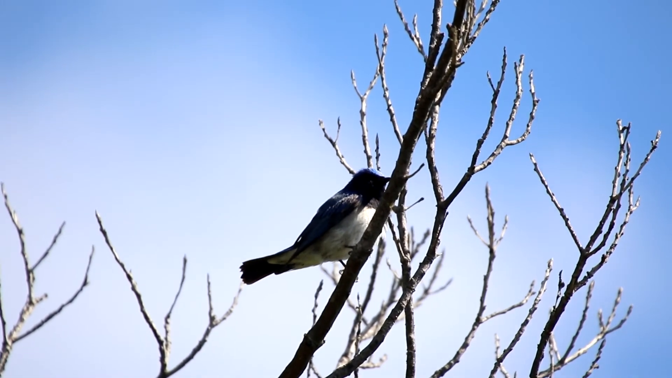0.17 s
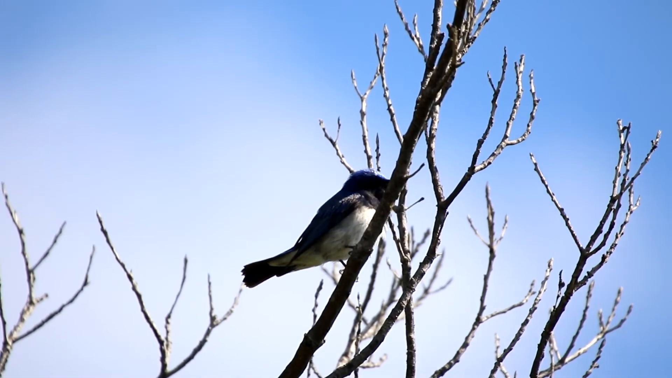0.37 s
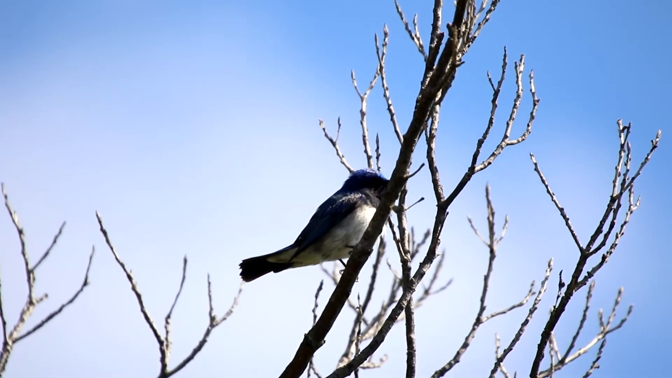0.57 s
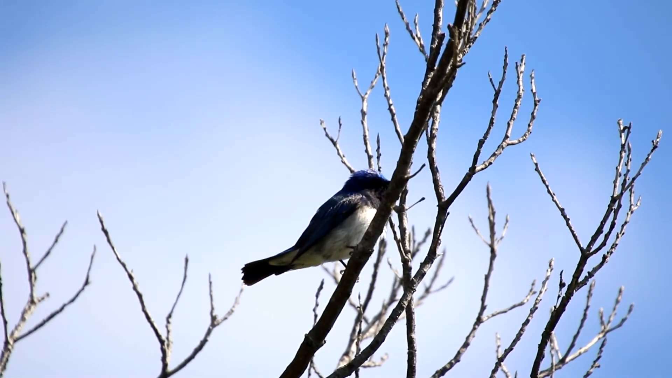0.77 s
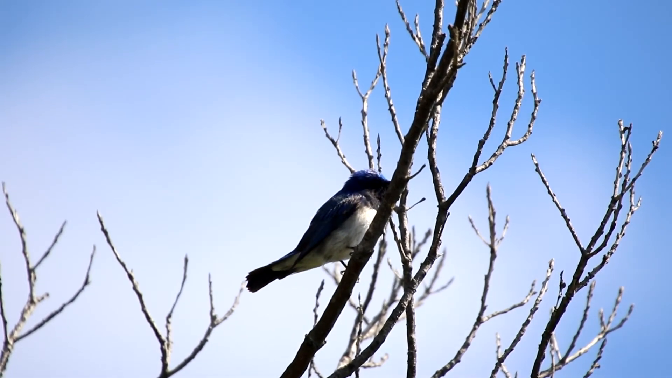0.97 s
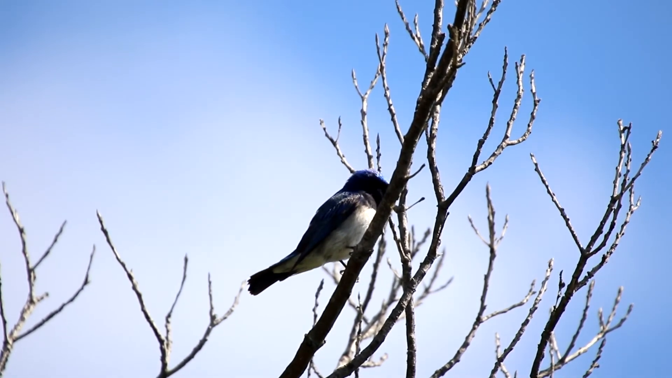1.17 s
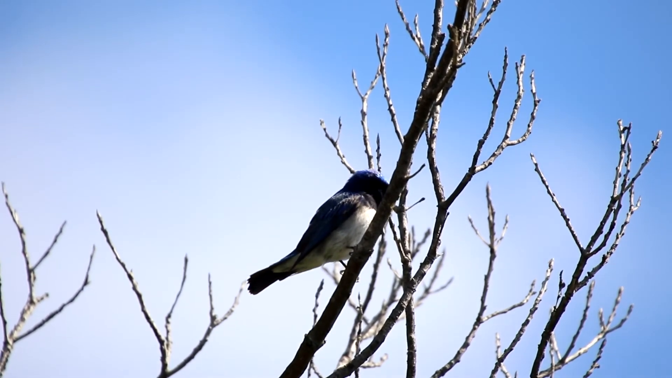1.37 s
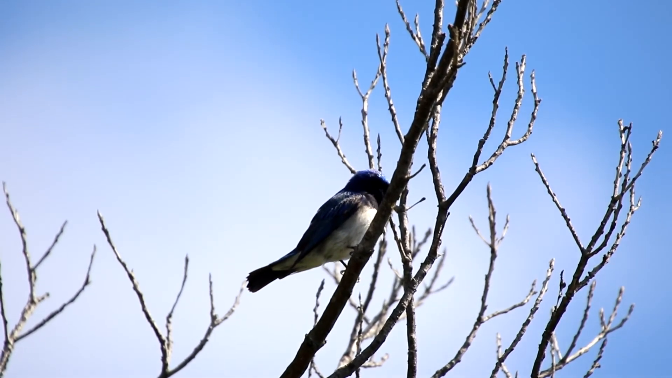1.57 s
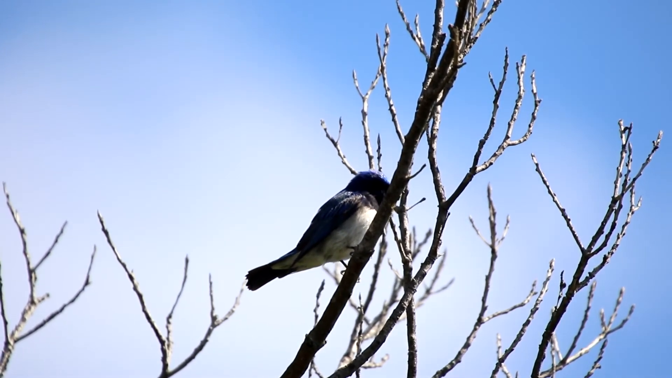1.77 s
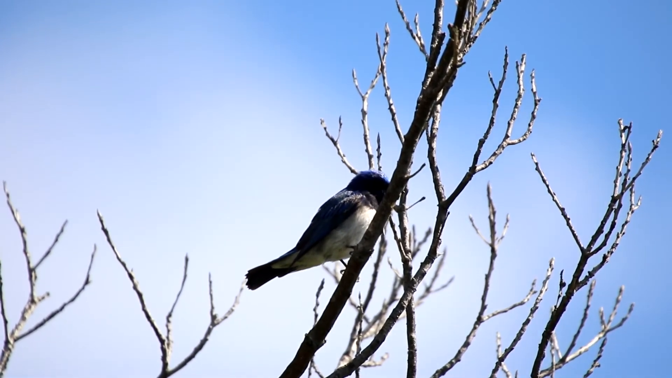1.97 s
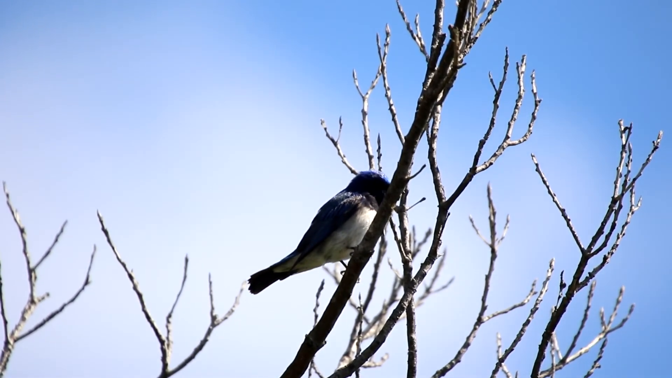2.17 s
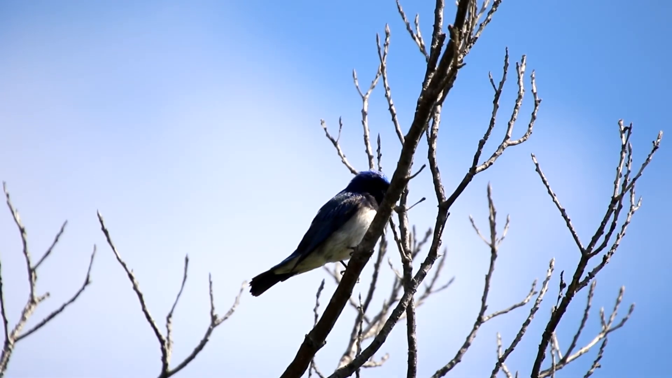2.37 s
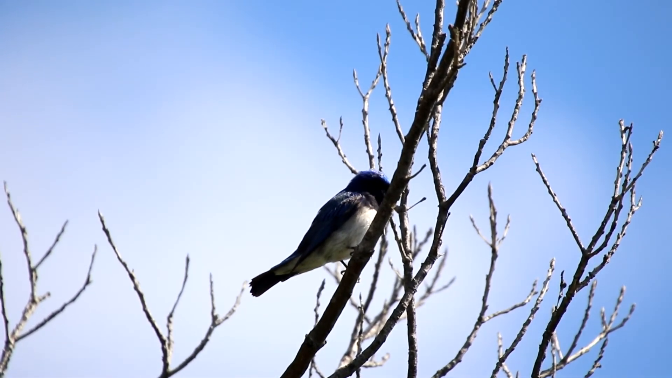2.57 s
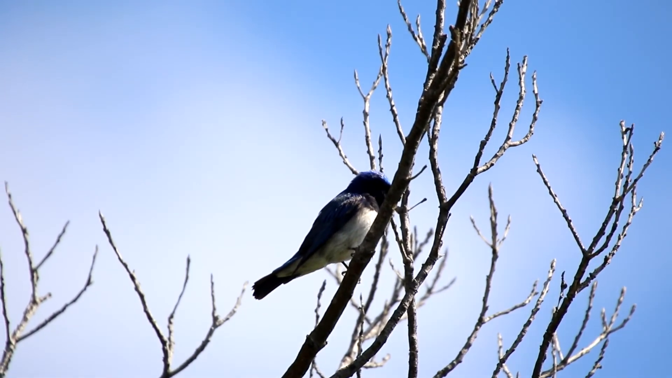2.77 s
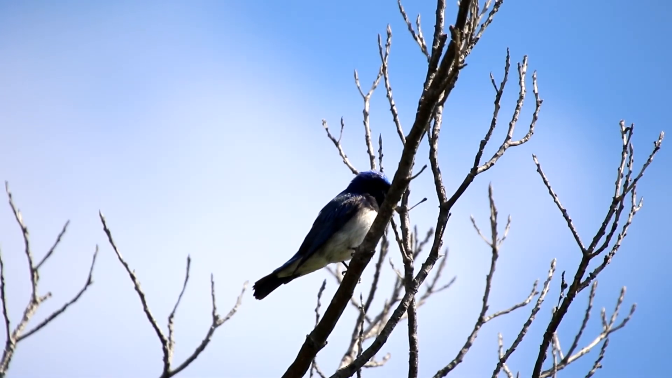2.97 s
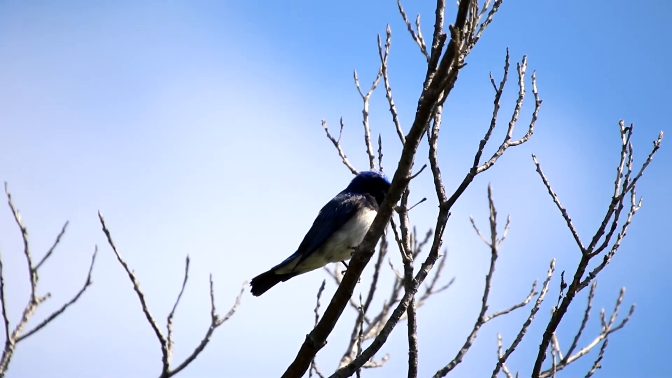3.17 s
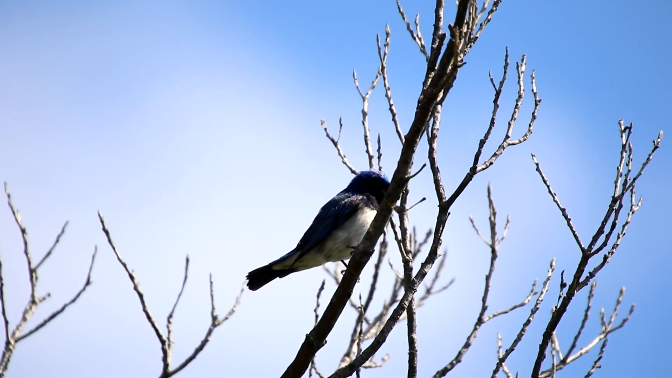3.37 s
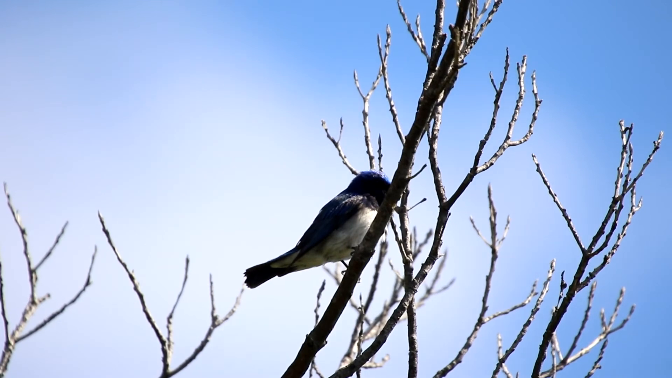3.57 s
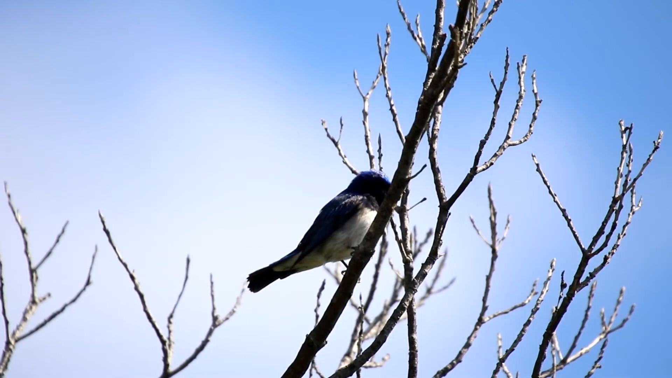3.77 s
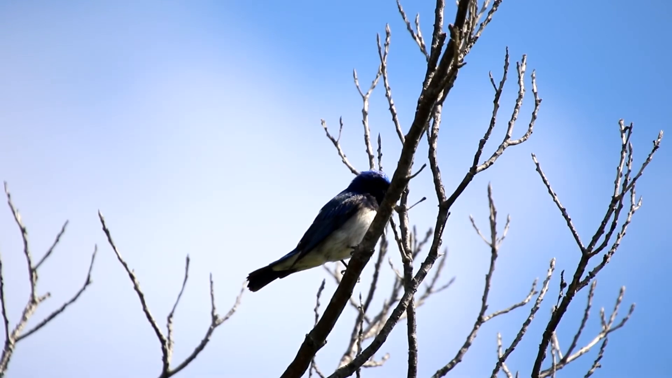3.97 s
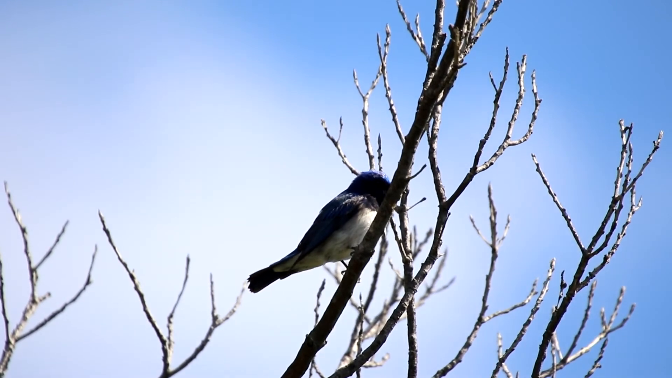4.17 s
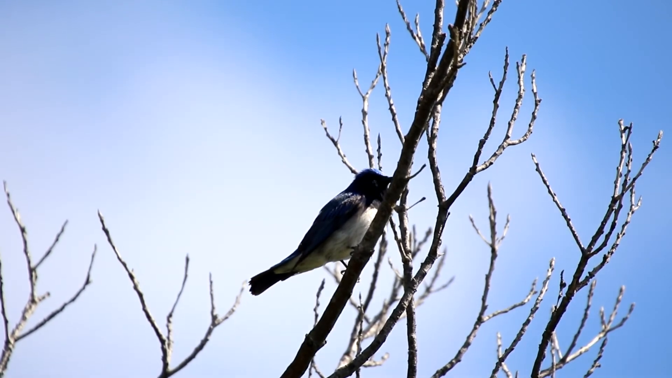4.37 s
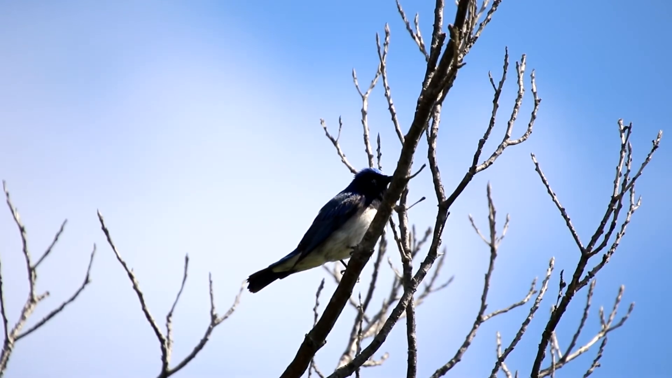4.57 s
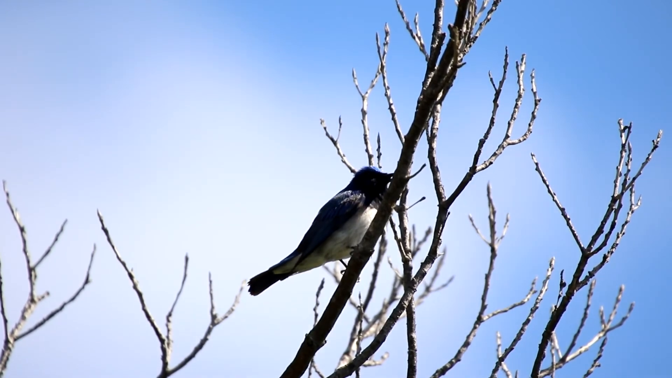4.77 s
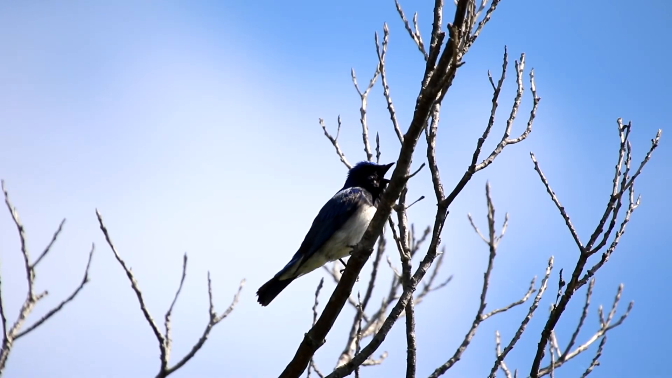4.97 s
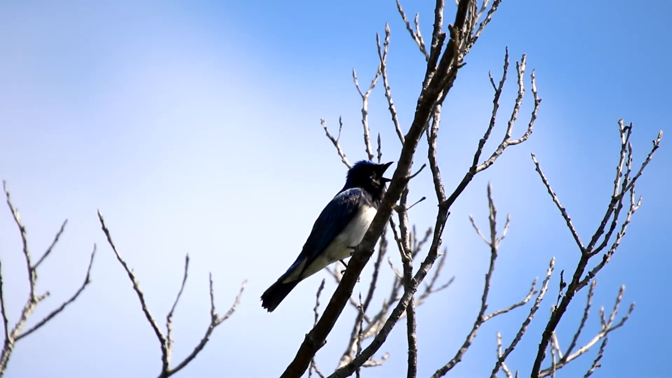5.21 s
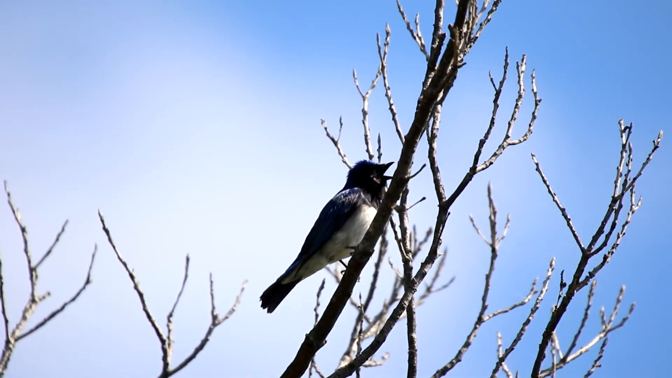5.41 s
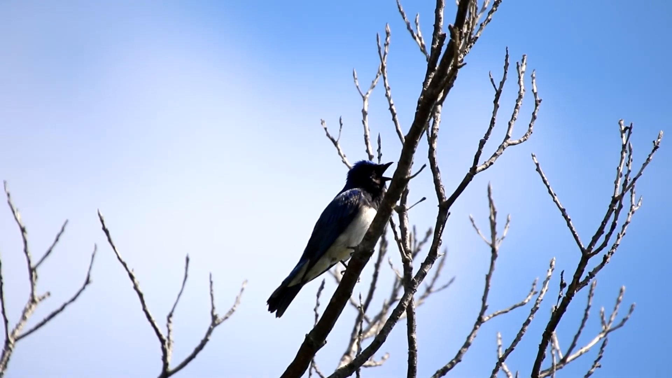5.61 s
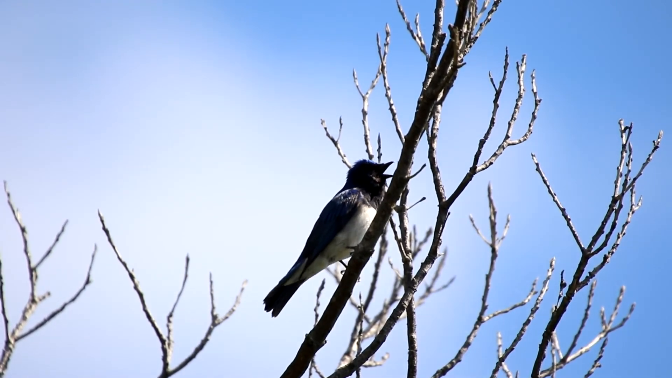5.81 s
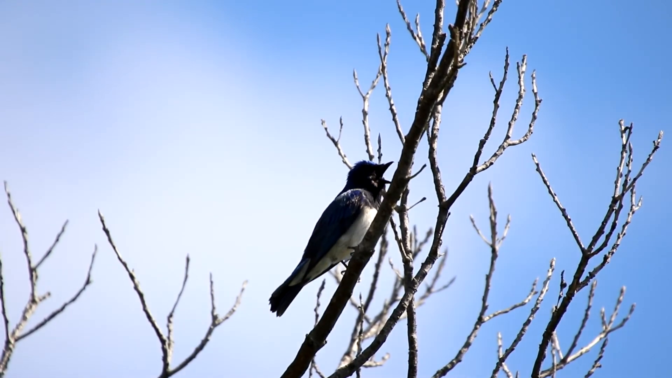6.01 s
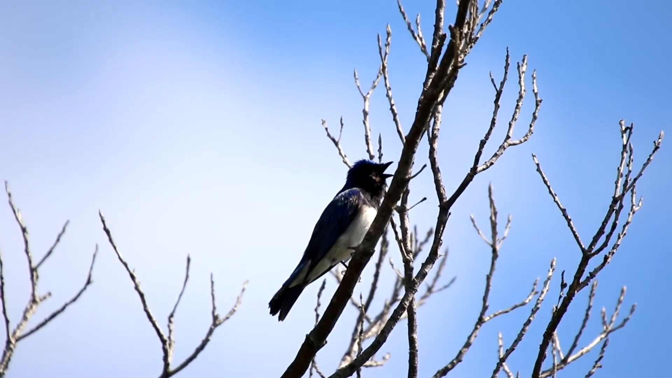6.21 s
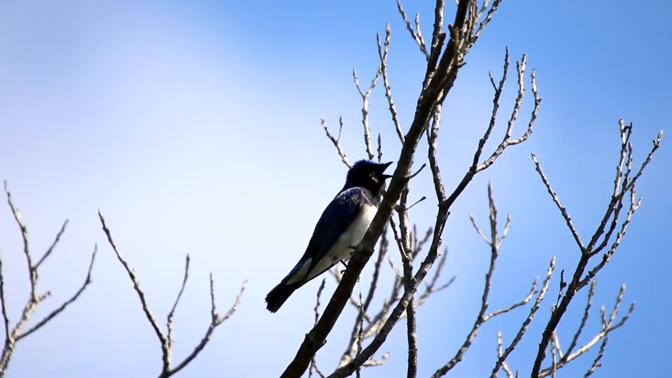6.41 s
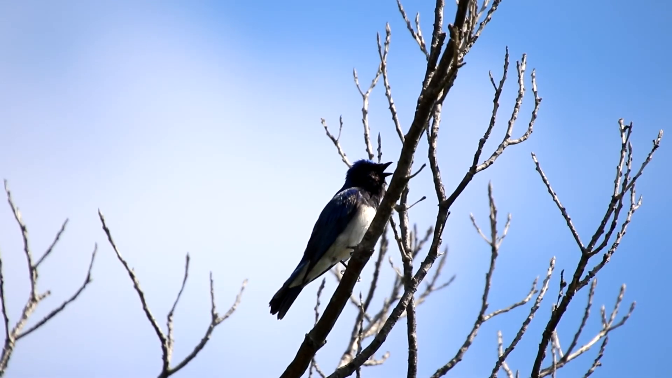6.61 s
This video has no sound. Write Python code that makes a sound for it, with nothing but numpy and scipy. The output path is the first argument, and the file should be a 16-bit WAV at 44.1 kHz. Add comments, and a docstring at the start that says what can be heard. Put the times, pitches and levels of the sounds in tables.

```python
"""Flycatcher on a bare branch

One loud phrase, whistled by the syrinx as a gliding near-sine: a quick trill, three slurs, two warbles.
Further off, faint chirps and peeps and a slowing string of pips; twigs and trees scatter every note.
Under it: open-air wash, a distant drone and hum, and a few close ticks, a rustle and soft bumps."""
import sys
import numpy as np
from scipy import signal
from scipy.fft import rfft, irfft
from scipy.io import wavfile

SR = 44100
rng = np.random.default_rng(int(sys.argv[2]) if len(sys.argv) > 2 else 0)


def master_out(mix):
    """Clip the mix to full scale and print it as 16-bit PCM to the path in sys.argv[1]."""
    frames = np.transpose(np.atleast_2d(mix))
    ceiling = np.clip(frames, -1, 1)
    pcm = np.round(ceiling * 32767).astype(np.int16)
    wavfile.write(sys.argv[1], SR, pcm)


N = 293265
T = np.arange(N) / SR

# trill upsweeps: start_s, length_s, start_hz, end_hz, level_db
TRILL_NOTES = [(4.987, .012, 3700, 4450, -37), (4.997, .026, 4480, 4530, -26.3),
               (5.021, .020, 4130, 4670, -22.7), (5.049, .021, 3750, 4800, -20.6),
               (5.076, 0.023, 3800, 4940, -19.8), (5.104, 0.022, 3820, 4880, -19.2),
               (5.134, .024, 3850, 4750, -20), (5.229, 0.0092, 3570, 4410, -39)]
# slurs: start_s, end_s, start_hz, end_hz, glide_s, linger_power, scoop_hz, level_db, swell_db, release_s
SLUR_NOTES = [(5.234, 5.391, 3490, 4075, .080, 2.6, 100, -19.2, 1.5, .012),
              (5.518, 5.681, 4175, 3520, 0.041, 1.1, 900, -18.9, 3.5, .002),
              (5.700, 5.784, 4250, 3600, .027, 1.6, 600, -21, -4.5, .003)]
# warbles, a third barely begun: start_s, end_s, pitch_hz, level_db, depth_hz, first_crest_s, flick_top_hz
WARBLE_NOTES = [(5.896, 6.151, 3570, -20, 155, .018, 5600), (6.272, 6.519, 3485, -18.2, 170, .006, 5050),
                (6.638, 6.885, 3485, -26.5, 170, .006, 5050)]
# syrinx harmonics 2 to 4: relative_db
OVERTONES_DB = [-38.5, -34.5, -56]
# throat and beak response on the overtones: frequency_hz, gain_db
BEAK_RESPONSE = [(7000, 0.5), (8100, 1.5), (9300, 2), (10400, -1), (11800, 9.5), (12600, 0.5), (14000, -5),
                 (15800, -2)]
# arched chirps: start_s, length_s, top_hz, level_db, twitter_db
ARCH_NOTES = [(1.696, 0.093, 4150, -51, -55), (1.955, 0.1, 4060, -52.5, -57), (2.591, .093, 4220, -49, -52),
              (2.868, .1, 4220, -43, -46.5), (3.485, 0.097, 4100, -48.5, -57.5),
              (4.197, 0.096, 4040, -56.5, -61)]
# buzzy sweeps: start_s, level_db, twitter_db
SWEEP_NOTES = [(1.372, -57.5, -58.5), (2.240, -64, -56), (3.142, -54.5, -50), (4.491, -58.5, -64)]
# contour of one sweep: offset_s, pitch_hz, relative_db, buzz_depth_hz
SWEEP_CONTOUR = [(0, 4400, -10, 0), (.025, 5090, -3, 254), (.056, 6050, 0, 520), (.080, 6700, -9, 119),
                 (.108, 6600, -5, -1), (.120, 5180, -7, 0)]
# flicks of one twitter: offset_s, length_s, start_hz, end_hz, relative_db
TWITTER_FLICKS = [(-.005, .017, 4600, 3050, 2.5), (0.012, .028, 3634, 4250, -3.5),
                  (0.035, .02, 4350, 5200, -13), (.041, .014, 2700, 3800, -6.5),
                  (.050, .021, 3500, 2300, -2.5)]
# stray peeps: start_s, length_s, start_hz, end_hz, level_db
PEEP_NOTES = [(0.085, 0.034, 2910, 1490, -52), (0.194, 0.025, 2180, 2300, -44.5),
              (0.219, .025, 2270, 2490, -52.5), (0.237, .035, 3500, 2900, -50),
              (.822, .038, 3300, 2990, -63), (1.10, .07, 3590, 3630, -56.5), (1.17, 0.045, 3520, 2850, -60),
              (1.182, .055, 4700, 3600, -62), (5.398, .045, 1610, 2790, -55),
              (5.528, 0.017, 2930, 1950, -50.5), (5.56, .026, 2590, 2530, -52),
              (5.63, 0.03, 2400, 1800, -56.5)]
# pip string envelope: time_s, level_db
PIP_ENVELOPE = [(4.5, -48.5), (4.6, -61), (4.95, -52.5), (5.3, -38.5), (5.6, -39.5), (6.03, -48.5)]
# dry ticks: start_s, peak_db, ring_hz, width_hz, decay_s
TICK_HITS = [(2.018, -25.5, 2300, 1000, 0.00058), (2.133, -42.5, 8500, 5000, 0.0011),
             (2.315, -30, 414, 250, 0.0073), (2.421, -31.5, 1500, 1500, 0.001),
             (2.510, -37.5, 2500, 1400, .001), (2.530, -34, 1190, 1200, .0012),
             (2.642, -34, 1490, 1100, 0.00094), (4.041, -31.5, 2930, 1700, 0.0035),
             (4.042, -41.5, 6250, 400, 0.002)]
# rustle envelope: time_s, level_db
RUSTLE_ENVELOPE = [(2.27, -60.5), (2.32, -50.5), (2.42, -51), (2.48, -57), (2.62, -57), (2.75, -60.5)]
# soft bumps: start_s, gain_db, decay_s
BUMP_HITS = [(.245, -39, .02), (.343, -23, 0.013), (.370, -31, 0.02)]
# modes a bump rings: frequency_hz, relative_db
BUMP_MODES = [(48, -1), (103, -1), (142, -1), (205, -10), (315, -12)]
# air spectrum: frequency_hz, relative_db
AIR_SPECTRUM = [(25, -25), (50, -11), (95, -2.5), (150, -1.5), (230, -2.5), (330, -4), (520, -5),
                (1000, -9), (1500, -16), (2500, -26.5), (4800, -36.5), (7200, -30.5), (11000, -33),
                (15500, -38.5)]
# drone envelope: time_s, relative_db
DRONE_ENVELOPE = [(0, -54), (1.5, -59.5), (2.6, -51.5), (3.6, -45), (5.2, -42), (6, -44.5), (6.65, -45)]
# machine hum envelope: time_s, relative_db
HUM_ENVELOPE = [(0, -60), (.6, -50.5), (1, -46.5), (2.2, -49), (3, -44.5), (4, -44), (6.65, -43)]
# machine whine envelope: time_s, level_db
WHINE_ENVELOPE = [(0, -93), (1.35, -64), (2.75, -69.5), (3.0, -60.5), (3.3, -70), (4.5, -74), (5.3, -66),
                  (6.65, -74)]


def flycatcher():
    """Trill of upsweeps, slurs that settle on a pitch, then warbles."""
    out = np.zeros(N)
    for start_s, length_s, start_hz, end_hz, db in TRILL_NOTES:
        add(out, start_s, glide(length_s, start_hz, end_hz, db, edge_db=5.5, jitter=.005, bend=.45))
    for start_s, end_s, start_hz, end_hz, glide_s, linger, scoop_hz, db, swell_db, release_s in SLUR_NOTES:
        t, progress = clock(end_s - start_s)
        hz = end_hz + (start_hz - end_hz) * np.exp(-(t / glide_s) ** linger)
        add(out, start_s, long_note(t, hz, db + swell_db * (progress - .5), scoop_hz, release_s))
    for start_s, end_s, *shape in WARBLE_NOTES:
        add(out, start_s, warble(end_s - start_s, *shape))
    return out


def warble(length_s, pitch_hz, db, depth_hz, crest_s, top_hz):
    """Sinking whistle with lopsided vibrato, louder at the crests; ends in an upward flick."""
    rate_hz, skew, vibrato_share, tremolo_db_per_hz = 35.7, .23, .86, .008
    sag_hz_per_s, lift_hz, lift_s, flick_s, hold_s = 700, 1100, .021, .0033, .004
    t, progress = clock(length_s)
    phase = 2 * np.pi * rate_hz * (t - crest_s)
    arch = np.sin(np.pi * np.minimum(progress / vibrato_share, 1)) ** .5
    waver = 1 + .22 * wander(60, size=len(t))
    vibrato_hz = depth_hz * arch * waver * (np.cos(phase) + skew * np.sin(2 * phase))
    to_top_s = np.maximum(t[-1] - hold_s - t, 0)
    hz = pitch_hz - sag_hz_per_s * t + vibrato_hz + lift_hz * np.exp(-to_top_s / lift_s)
    hz = hz + (top_hz - hz) * np.exp(-to_top_s / flick_s)
    return long_note(t, hz, db + tremolo_db_per_hz * vibrato_hz, scoop_hz=1400, release_s=.005)


def long_note(t, hz, db, scoop_hz, release_s):
    """Whistle that drops onto its pitch as it swells; weakens when pushed high."""
    scoop_s, attack_db, attack_s, release_db = .0055, 22, .0062, 10
    strain_hz, strain_db_per_hz = 4300, .006
    hz = hz + scoop_hz * np.exp(-t / scoop_s)
    envelope_db = -attack_db * np.exp(-t / attack_s) - release_db * np.exp((t - t[-1]) / release_s)
    strain_db = strain_db_per_hz * np.maximum(hz - strain_hz, 0)
    return whistle(hz, db + envelope_db - strain_db)


def glide(length_s, start_hz, end_hz, db, edge_db, jitter, bend=1):
    """Short slide, loudest in the middle; bend < 1 moves fastest at first."""
    _, progress = clock(length_s)
    hz = start_hz + (end_hz - start_hz) * progress ** bend
    return whistle(hz, db - edge_db * (2 * progress - 1) ** 2, jitter)


def whistle(hz, db, jitter=.0031, edge_s=.0027):
    """Syrinx tone: a near-sine with weak overtones coloured by throat and beak."""
    t = np.arange(len(hz)) / SR
    hz = hz * (1 + jitter * wander(440, size=len(t)))
    phase = 2 * np.pi * np.cumsum(hz) / SR
    tone = np.sin(phase)
    for k, overtone_db in enumerate(OVERTONES_DB, 2):
        beak_db = np.interp(k * hz, *np.transpose(BEAK_RESPONSE))
        tone += undb(overtone_db + beak_db) * np.sin(k * phase) * (k * hz < SR / 2)
    ramp = np.clip(np.minimum(t, t[-1] - t) / edge_s, 0, 1)
    gate = np.sin(np.pi / 2 * ramp) ** 2
    return np.sqrt(2) * undb(db) * gate * tone


def chirps(buzz_hz=130, overlap_s=.006, jitter=.024):
    """Far bird: arches that hook up and climb, and buzzy sweeps; each ends in a twitter."""
    hook_share, hook_s, climb_share, attack_db, attack_s = .32, .011, .15, 19, .014
    out = np.zeros(N)
    for start_s, length_s, top_hz, db, twitter_db in ARCH_NOTES:
        t, progress = clock(length_s)
        hz = top_hz * (1 - climb_share * (1 - progress) - hook_share * np.exp(-t / hook_s))
        add(out, start_s, whistle(hz, db - attack_db * np.exp(-t / attack_s), jitter * progress))
        add(out, start_s + length_s - overlap_s, twitter(twitter_db))
    offsets_s, *columns = np.transpose(SWEEP_CONTOUR)
    t, _ = clock(offsets_s[-1])
    pitch_hz, relative_db, depth_hz = (np.interp(t, offsets_s, column) for column in columns)
    hz = pitch_hz + depth_hz * np.cos(2 * np.pi * buzz_hz * t)
    for start_s, db, twitter_db in SWEEP_NOTES:
        add(out, start_s, whistle(hz, db + relative_db, jitter))
        add(out, start_s + t[-1], twitter(twitter_db))
    return out


def twitter(db, pitch_spread=.04):
    """Two-voiced cluster of scratchy flicks, each randomly detuned."""
    out = np.zeros(SR // 4)
    for offset_s, length_s, start_hz, end_hz, relative_db in TWITTER_FLICKS:
        shift = 1 + pitch_spread * rng.standard_normal()
        flick = glide(length_s, shift * start_hz, shift * end_hz, db + relative_db, edge_db=4, jitter=.035)
        add(out, offset_s, flick)
    return out


def peeps():
    """Single sliding notes from other birds."""
    out = np.zeros(N)
    for start_s, length_s, start_hz, end_hz, db in PEEP_NOTES:
        add(out, start_s, glide(length_s, start_hz, end_hz, db, edge_db=5, jitter=.015))
    return out


def pips(first_s=4.508, count=17, length_s=.043, gap_s=.0838, slowing_s=.053):
    """Far bird: a string that slows and sinks, each pip falling more steeply than the last."""
    pitch_hz, sink_hz, first_lift_hz = 3050, 304, 330
    out, centre_s = np.zeros(N), first_s
    for k, progress in enumerate(np.linspace(0, 1, count)):
        hz = pitch_hz - sink_hz * progress + first_lift_hz * (k == 0)
        fall = .012 + .05 * progress
        db = np.interp(centre_s, *np.transpose(PIP_ENVELOPE))
        pip = glide(length_s, hz * (1 + fall), hz * (1 - fall), db, edge_db=17, jitter=.003)
        add(out, centre_s - length_s / 2, pip)
        centre_s += gap_s + slowing_s * (k / (count - 2)) ** 4
    return out


def trees(x, twigs_db, wood_db, twigs_t60_s=.17, wood_t60_s=.86):
    """Direct sound, sparse echoes off near twigs and a longer tail from the wood behind."""
    t = T[:SR]
    twigs = rng.standard_normal(SR) * (rng.random(SR) < .05) * undb(-60 * t / twigs_t60_s) * (t > .003)
    wood = rng.standard_normal(SR) * undb(-60 * t / wood_t60_s) * (1 - np.exp(-t / .019))
    echo = undb(twigs_db) * twigs / np.linalg.norm(twigs) + undb(wood_db) * wood / np.linalg.norm(wood)
    return x + signal.fftconvolve(x, echo)[:N]


def ticks():
    """Dry ticks: brief noise bursts through a resonance."""
    out, t = np.zeros(N), T[:SR // 2]
    for start_s, peak_db, hz, width_hz, decay_s in TICK_HITS:
        burst = rng.standard_normal(len(t)) * np.exp(-t / decay_s)
        ring = resonate(resonate(burst, hz, width_hz), hz, 2 * width_hz)
        lowpass = signal.butter(4, min(hz + width_hz, SR / 3), fs=SR, output="sos")
        tick = signal.sosfilt(lowpass, ring)
        add(out, start_s, undb(peak_db) * tick / np.abs(tick).max())
    return out


def rustle(grains_per_s=1500):
    """Tiny random grains through two broad resonances."""
    grains = rng.standard_normal(N) * (rng.random(N) < grains_per_s / SR)
    coloured = resonate(resonate(grains, hz=1100, width_hz=2200), hz=1700, width_hz=7000)
    return unit(coloured) * undb(curve(RUSTLE_ENVELOPE))


def bumps(rise_s=.0054):
    """Soft close bumps: low modes that die quickly."""
    out, t = np.zeros(N), T[:SR // 2]
    for start_s, gain_db, decay_s in BUMP_HITS:
        ring = sum(undb(db) * np.sin(2 * np.pi * (hz * t + rng.random())) for hz, db in BUMP_MODES)
        envelope = np.exp(-t / decay_s) * (1 - np.exp(-t / rise_s))
        add(out, start_s, undb(gain_db) * ring * envelope)
    return out


def air(level_db=-46, flicker_db=.46):
    """Open-air wash: shaped noise with a slight level flicker."""
    hz, db = np.transpose(AIR_SPECTRUM)
    bins_hz = np.fft.rfftfreq(N, 1 / SR)
    colour = undb(np.interp(np.log(bins_hz + 1), np.log(hz), db))
    wash = unit(irfft(rfft(rng.standard_normal(N)) * colour, N))
    return wash * undb(level_db + flicker_db * wander(7.2))


def drone(gain_db=-5):
    """Distant drone: a noise band that slowly swells."""
    return band_noise(hz=416, width_hz=400) * undb(curve(DRONE_ENVELOPE) + gain_db)


def machine(hum_hz=254.7, hum_gain_db=-4.5, whine_hz=1810):
    """Far machine: unsteady low hum and thin whine."""
    tone = drifting_sine(hum_hz, drift_hz=1.624, rate_hz=6.03)
    hum = unit(tone + .71 * band_noise(hum_hz, width_hz=30))
    whine = drifting_sine(whine_hz, drift_hz=2.3, rate_hz=20)
    whine_db = curve(WHINE_ENVELOPE) + 2 * wander(7.4)
    return hum * undb(curve(HUM_ENVELOPE) + hum_gain_db) + whine * undb(whine_db)


def drifting_sine(hz, drift_hz, rate_hz):
    """Sine with wandering pitch, rms 1."""
    return np.sqrt(2) * np.sin(2 * np.pi * np.cumsum(hz + drift_hz * wander(rate_hz)) / SR)


def band_noise(hz, width_hz):
    """Noise through a resonance twice, rms 1."""
    return unit(resonate(resonate(rng.standard_normal(N), hz, width_hz), hz, width_hz))


def resonate(x, hz, width_hz):
    """One resonance, gain 1 at centre."""
    return signal.lfilter(*signal.iirpeak(hz, hz / width_hz, fs=SR), x)


def wander(rate_hz, size=N):
    """Smooth random drift, rms 1."""
    bins_hz = np.fft.rfftfreq(size, 1 / SR)
    return unit(irfft(rfft(rng.standard_normal(size)) * np.exp(-(bins_hz / rate_hz) ** 2), size))


def clock(length_s):
    """Time within a note, and progress from 0 to 1."""
    t = np.arange(0, length_s, 1 / SR)
    return t, t / t[-1]


def curve(rows):
    """Linear interpolation of (time_s, value) rows."""
    return np.interp(T, *np.transpose(rows))


def add(out, start_s, x):
    """Mix x in at start_s, no earlier than 0."""
    i = max(int(start_s * SR), 0)
    out[i:i + len(x)] += x[:max(N - i, 0)]


def undb(db):
    """Decibels to gain."""
    return 10 ** (np.asarray(db) / 20)


def unit(x):
    """Scale to rms 1."""
    return x / np.sqrt(np.mean(x ** 2))


def scene():
    """Mono mix; the near singer is driest, far birds carry more of the wood."""
    singer = trees(flycatcher(), twigs_db=-10.5, wood_db=-30.5)
    others = trees(chirps() + peeps(), twigs_db=-7.5, wood_db=-11.5)
    piper = trees(pips(), twigs_db=-13, wood_db=-14.5)
    return (singer + others + piper + ticks() + rustle() + bumps() + air() + drone() + machine())[None]


def record(dry, cutoff_hz=15700):
    """Steep low-pass."""
    return signal.sosfilt(signal.ellip(12, .1, 80, cutoff_hz, fs=SR, output="sos"), dry)


dry = scene()
out = record(dry)
master_out(out)
```